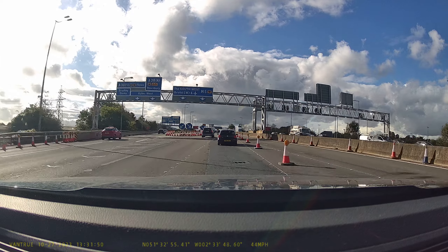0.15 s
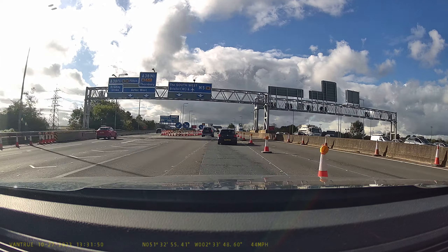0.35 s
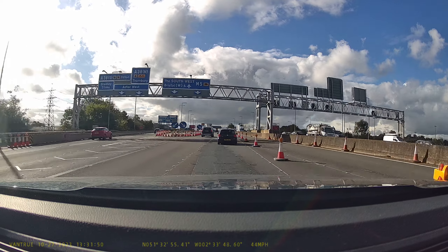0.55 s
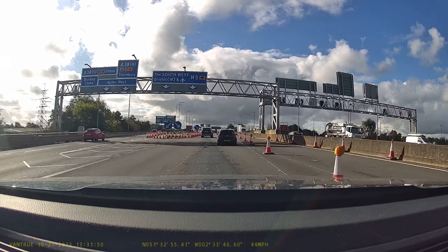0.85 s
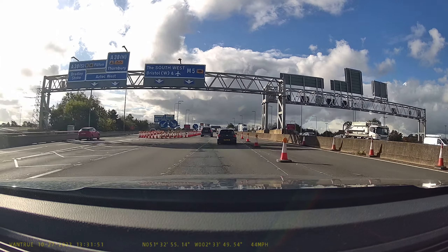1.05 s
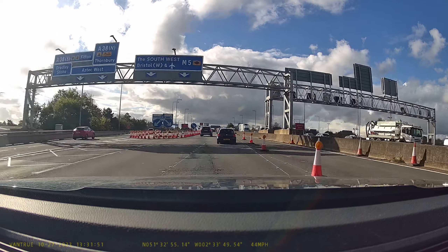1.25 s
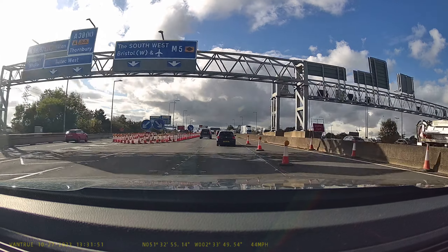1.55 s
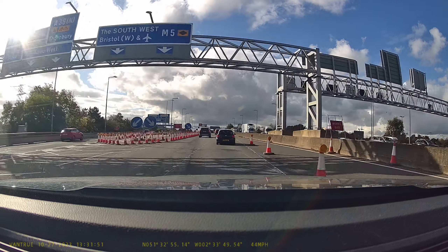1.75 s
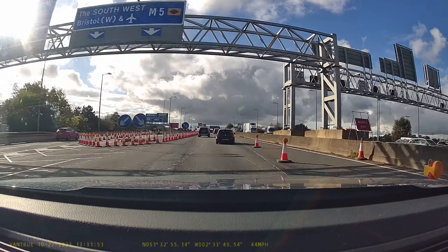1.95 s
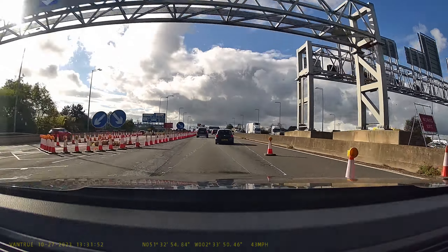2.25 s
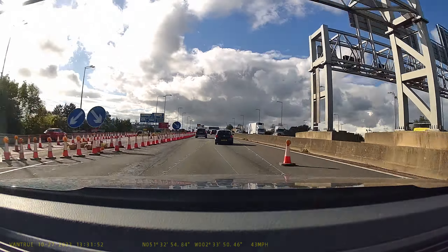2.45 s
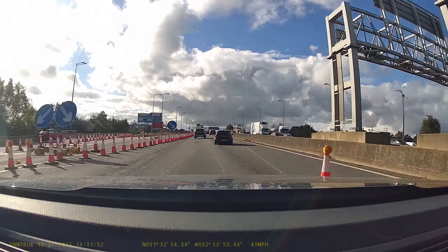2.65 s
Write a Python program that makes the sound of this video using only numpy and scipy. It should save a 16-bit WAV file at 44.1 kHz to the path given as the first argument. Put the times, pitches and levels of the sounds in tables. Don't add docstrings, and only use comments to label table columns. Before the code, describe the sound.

Deep road rumble fills a moving car's cabin, with engine hum and muffled tyre roar beneath; soft seam thuds come irregularly, strongest around two seconds, heard by a small windscreen microphone with faint hiss.

```python
import sys
import numpy as np
from scipy import signal
from scipy.fft import rfft, irfft, next_fast_len
from scipy.io import wavfile
from scipy.ndimage import uniform_filter1d, map_coordinates

SR = 44100
rng = np.random.default_rng(int(sys.argv[2]) if len(sys.argv) > 2 else 0)


def invert_db(x):
    u = np.asarray(x, float) / 20
    return 10 ** u


def digitize_waveform(pressure):
    field = np.atleast_2d(pressure).T
    bounded = np.clip(field, -1, 1)
    quanta = np.round(bounded * 32767).astype(np.int16)
    wavfile.write(sys.argv[1], SR, quanta)


N = 123479


def unit(x):
    return x / np.sqrt(np.mean(x ** 2) + 1e-20)


def along(points, hz):
    point_hz, point_db = np.transpose(points)
    return np.interp(np.log(hz + 1), np.log(point_hz + 1), point_db)


def wobble(knots_per_s):
    return map_coordinates(rng.standard_normal(200), [np.arange(N) * knots_per_s / SR])


def filtered(x, response):
    size = next_fast_len(N + SR // 2)
    hz = np.fft.rfftfreq(size, 1 / SR)
    return irfft(rfft(x, size) * response(hz), size)[:N]


def patchy(x, patchy_db):
    z = signal.stft(x, nperseg=1024)[2]
    field = uniform_filter1d(rng.standard_normal(z.shape), size=6, axis=0)
    field = uniform_filter1d(field, size=5, axis=1)
    return signal.istft(z * invert_db(patchy_db * unit(field)), nperseg=1024)[1][:N]


def resonant(modes):
    even_s = 0.12
    x = np.zeros(N)
    for mode_hz, width_hz, level_db in modes:
        def ring(f):
            damping = 1j * f * width_hz
            return (damping / (mode_hz ** 2 - f ** 2 + damping)) ** 2
        x = x + invert_db(level_db) * filtered(rng.standard_normal(N), ring)
    power = uniform_filter1d(x ** 2, int(even_s * SR))
    power = uniform_filter1d(power, int(even_s * SR / 2))
    return unit(x / np.sqrt(np.abs(power) + 1e-12))


# (time [s], long unevenness [dB], coarse texture [dB])
ROAD_SURFACE = [(0, -38.5, -45), (.15, -41.5, -48.5), (.3, -44, -48), (.55, -43, -46.5), (.8, -42, -45.5),
                (.93, -45.5, -46), (1.05, -42, -44), (1.18, -47.5, -49.5), (1.3, -41.5, -46),
                (1.6, -44.5, -49.5), (1.75, -42.5, -43.5), (1.95, -40.5, -39), (2.1, -38, -41.5),
                (2.2, -39.5, -50), (2.38, -39.5, -43), (2.57, -42.5, -50), (2.7, -39.5, -46),
                (2.8, -45.5, -46)]


def surface():
    s, uneven_db, texture_db = np.transpose(ROAD_SURFACE)
    t = np.arange(N) / SR
    return np.interp(t, s, uneven_db), np.interp(t, s, texture_db)


# (frequency [Hz], width [Hz], level [dB])
CABIN_MODES = [(25.1, 14, -18), (40.9, 11.4, -2), (57, 12, -3.5), (71, 12.8, -3), (104, 16.6, -3.5),
               (122.14, 13.5, -3.5)]
# (frequency [Hz], width [Hz], level [dB])
PANEL_MODES = [(146, 18.7, -2), (166.7, 14.6, 1), (192.4, 21.8, 2), (216.6, 12.7, -1.5), (242.7, 18, -4),
               (275.8, 30.7, -9), (299, 21.4, -5.5), (337.4, 39.7, -13.5)]


def rumble():
    boom_db, drone_db = 1, 0
    uneven_db, texture_db = surface()
    boom = invert_db(boom_db + uneven_db + 1.5 * wobble(17)) * resonant(CABIN_MODES)
    drone = invert_db(drone_db + texture_db + 0.85 * wobble(6.92)) * resonant(PANEL_MODES)
    return boom + drone


# (time [s], peak level [dB], pitch [Hz], swell [cycles])
ROAD_SEAMS = [(.06, -35.5, 64.6, 0.95), (0.109, -29.5, 115, 1.4), (0.166, -29, 81, .7),
              (.43, -35, 106, 1.2), (.525, -34.5, 117, 1.3), (0.651, -34, 107, 1.7), (.73, -29.5, 76, 1.35),
              (1.138, -35.5, 115, 1.2), (1.237, -29, 96.5, 0.89), (1.29, -33.5, 79.6, 1.6),
              (1.384, -33.5, 104, 0.57), (1.56, -30, 105, 1.4), (1.79, -28, 110, 3.1),
              (1.904, -32.5, 131, 0.91), (1.944, -29, 107, 1.3), (1.978, -22, 76.4, 0.88),
              (2.01, -28.5, 104, 1.1), (2.1, -29.5, 201, .8), (2.255, -25, 113, 2.5),
              (2.52, -32.5, 112, 1.8), (2.6, -32.5, 104, 1.5)]


def seams():
    fall_cycles = 1.22
    thuds = np.zeros(N)
    for s, peak_db, hz, swell_cycles in ROAD_SEAMS:
        cycles = (np.arange(N) / SR - s) * hz
        span = np.where(cycles < 0, swell_cycles, fall_cycles)
        thuds += invert_db(peak_db) * np.exp(-(cycles / span) ** 2) * np.cos(2 * np.pi * cycles)
    return thuds


def engine():
    firing_hz, drift_hz, level_db = 73.56, 1.54, -47.5
    uneven_db = surface()[0]
    phase = 2 * np.pi * np.cumsum(firing_hz + drift_hz * wobble(5.03)) / SR
    shaken_db = 0.7 * (uneven_db - uneven_db.mean())
    return invert_db(level_db + shaken_db + 3.7 * wobble(4)) * np.sin(phase)


# (frequency [Hz], level [dB per Hz])
TYRE_SPECTRUM = [(190, -31), (330, -3), (427, -0.5), (552, -4.5), (610, -7.5), (871, -10), (1050, -10.5),
                 (1210, -15), (1600, -34), (2080, -61), (3520, -120)]
# (frequency [Hz], width [Hz], level [dB])
TREAD_HUMPS = [(439, 86, 3.5), (611, 11, 7), (723, 70, 3), (964, 60, 1), (1142, 61, 1.5)]


def roar():
    level_db, growth = -55, 0.17

    def body(f):
        humps_db = sum(db * np.exp(-((f - hz) / width_hz) ** 2) for hz, width_hz, db in TREAD_HUMPS)
        return invert_db(along(TYRE_SPECTRUM, f) + humps_db)

    noise = unit(filtered(patchy(rng.standard_normal(N), patchy_db=0.9), body))
    texture_db = surface()[1]
    return invert_db(level_db + growth * (texture_db - texture_db.mean())) * noise


# (frequency [Hz], level [dB per Hz])
HISS_SPECTRUM = [(900, -0.5), (1600, -1.5), (2580, -4.5), (5000, -6.5), (7500, -7.5), (9000, -9.5),
                 (11000, -12.5), (15700, -14)]


def microphone_hiss():
    hiss = patchy(rng.standard_normal(N), patchy_db=0.63) * invert_db(0.25 * wobble(11.94))
    return invert_db(-66.5) * unit(filtered(hiss, lambda f: invert_db(along(HISS_SPECTRUM, f))))


def electrical_whine():
    whine_hz, level_db = 3120, -99
    return invert_db(level_db) * np.sin(2 * np.pi * whine_hz * np.arange(N) / SR)


def scene():
    return (rumble() + seams() + engine() + roar())[None]


def roll_off(x):
    return signal.sosfilt(signal.butter(12, 16680, fs=SR, output="sos"), x)


def record(dry):
    low_cut_hz, top_hz = 31.6, 15730
    x = filtered(dry[0], lambda f: (1j * f / (low_cut_hz + 1j * f)) ** 2)
    x = x + microphone_hiss() + electrical_whine()
    mix = filtered(x, lambda f: f < top_hz)[None]
    return roll_off(mix)


dry = scene()
out = record(dry)
digitize_waveform(out)
```